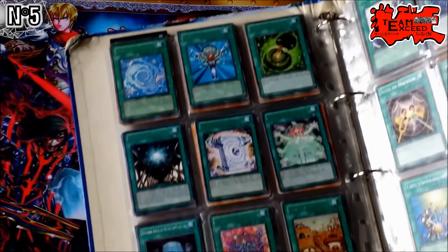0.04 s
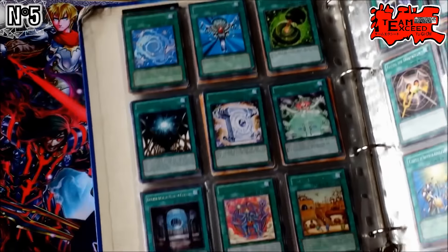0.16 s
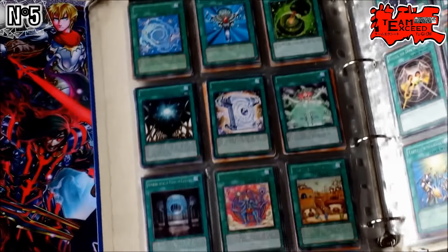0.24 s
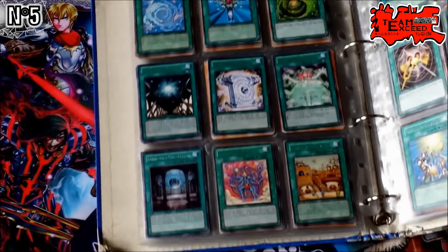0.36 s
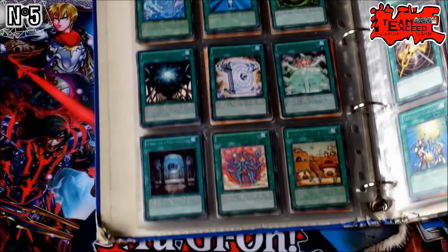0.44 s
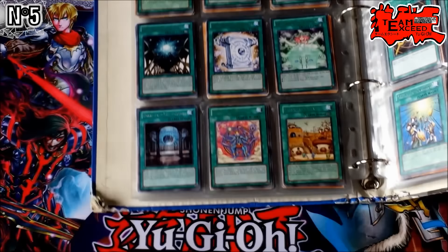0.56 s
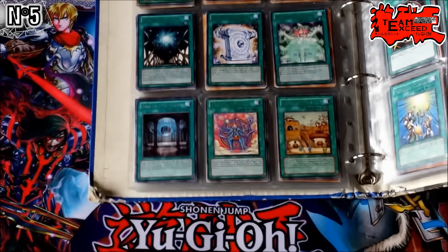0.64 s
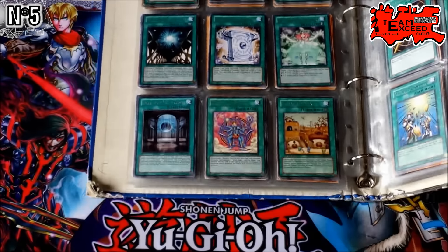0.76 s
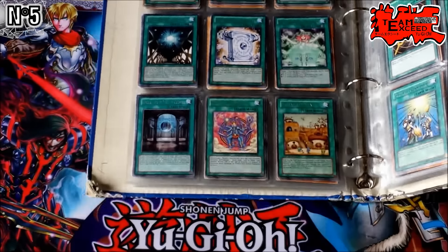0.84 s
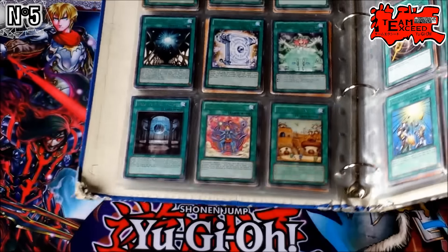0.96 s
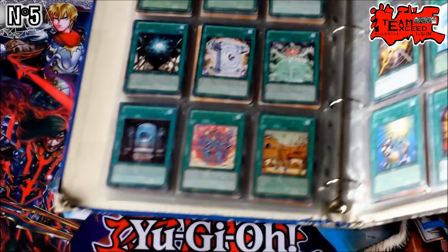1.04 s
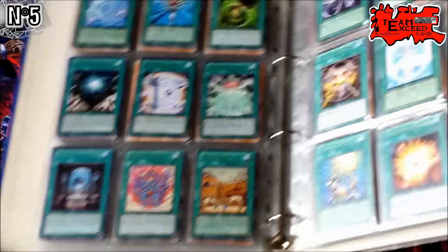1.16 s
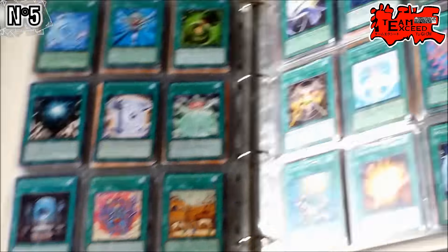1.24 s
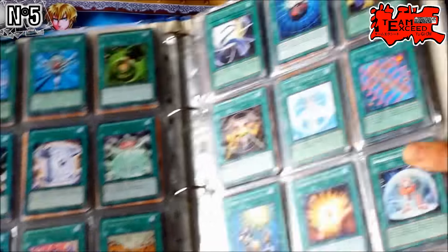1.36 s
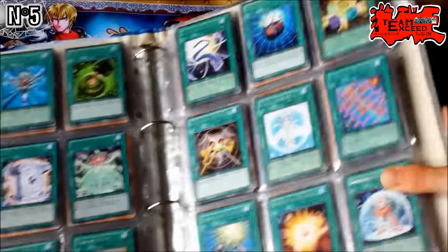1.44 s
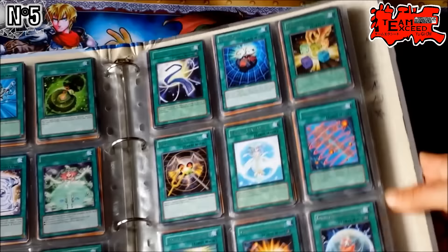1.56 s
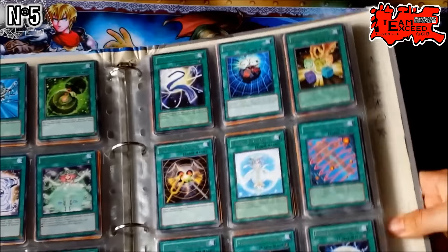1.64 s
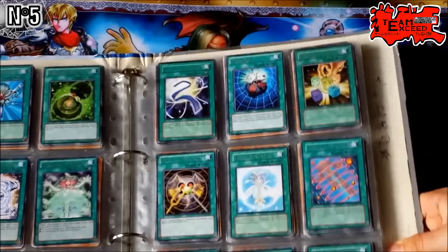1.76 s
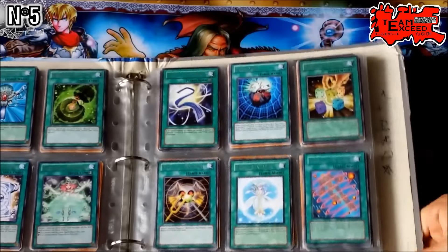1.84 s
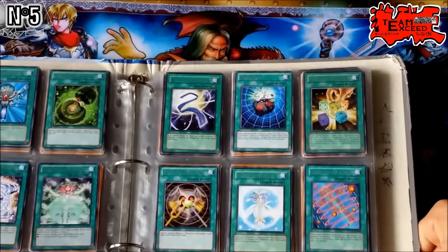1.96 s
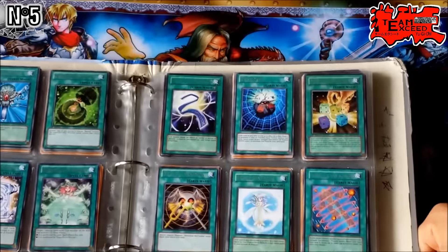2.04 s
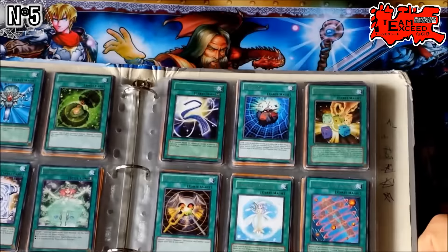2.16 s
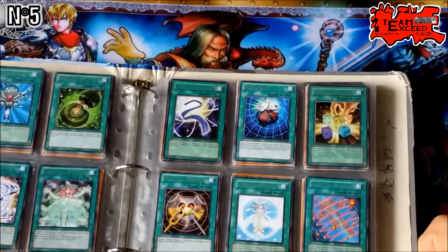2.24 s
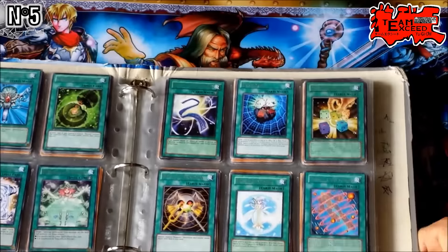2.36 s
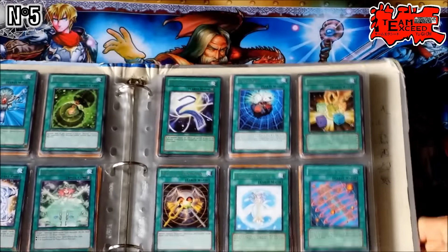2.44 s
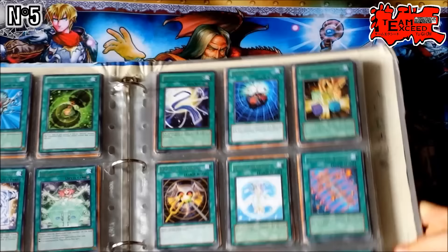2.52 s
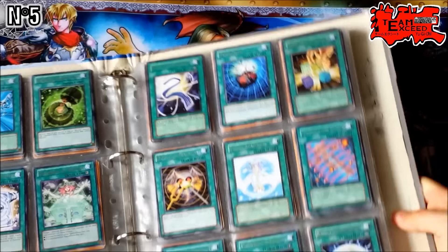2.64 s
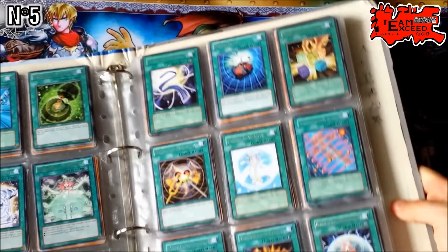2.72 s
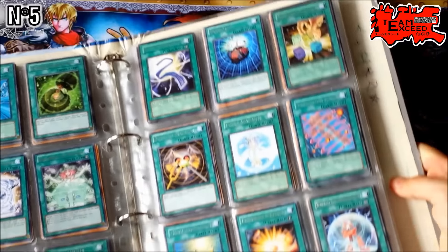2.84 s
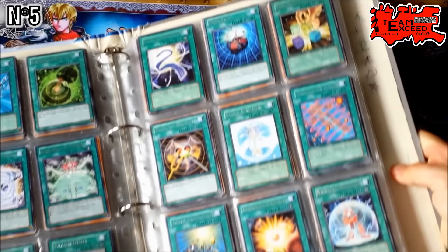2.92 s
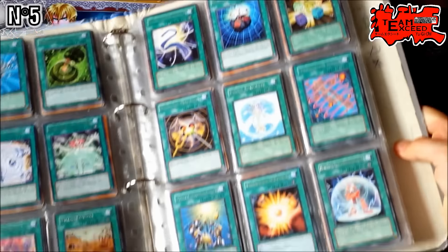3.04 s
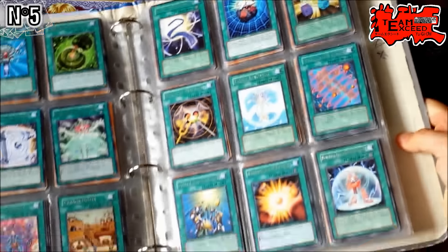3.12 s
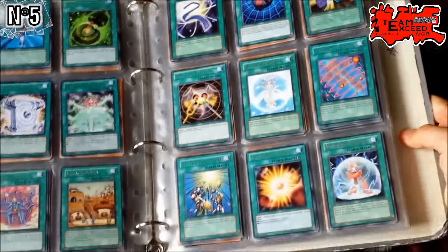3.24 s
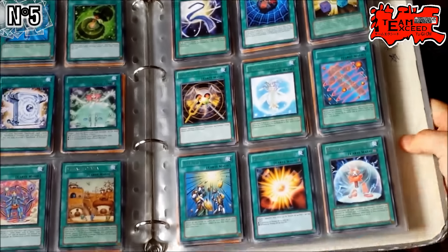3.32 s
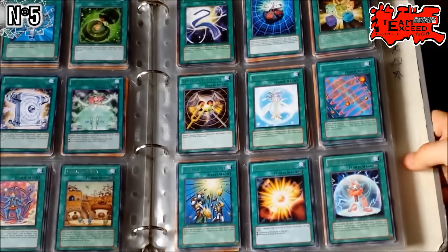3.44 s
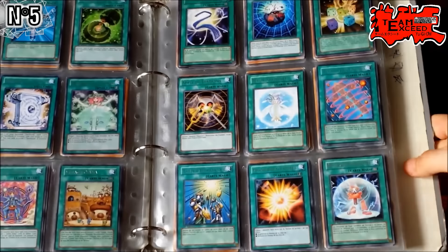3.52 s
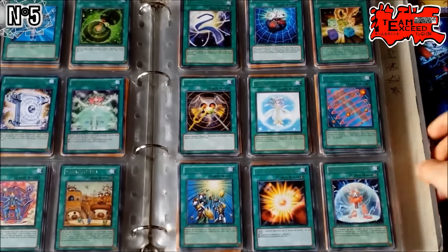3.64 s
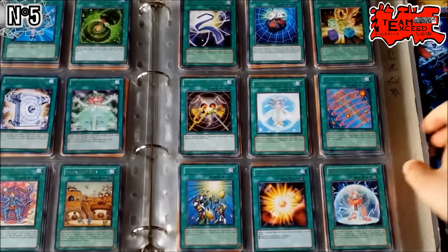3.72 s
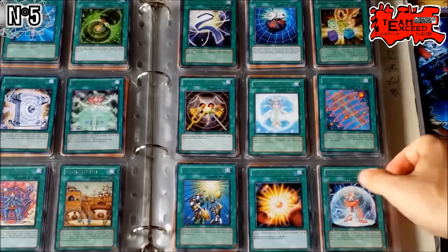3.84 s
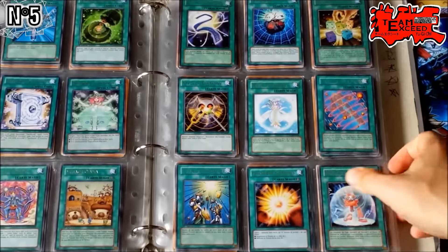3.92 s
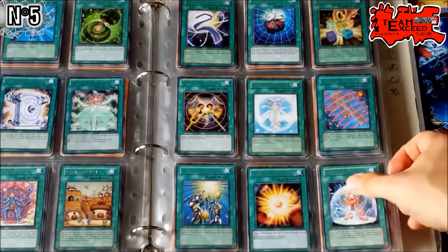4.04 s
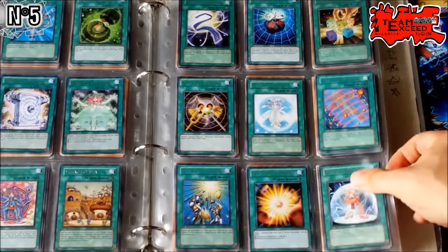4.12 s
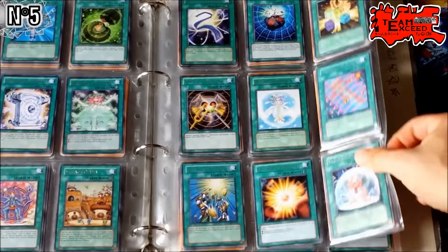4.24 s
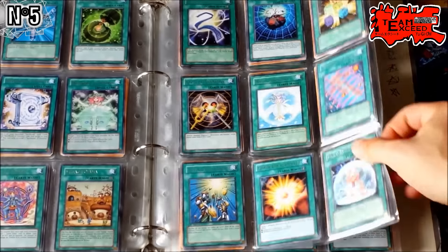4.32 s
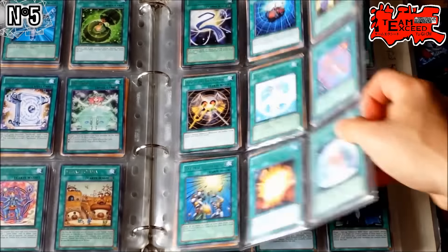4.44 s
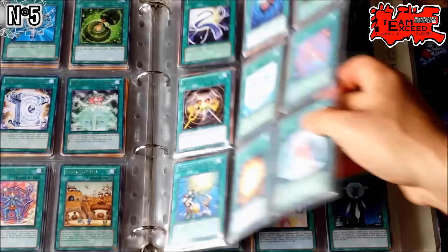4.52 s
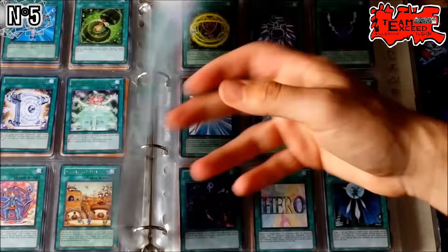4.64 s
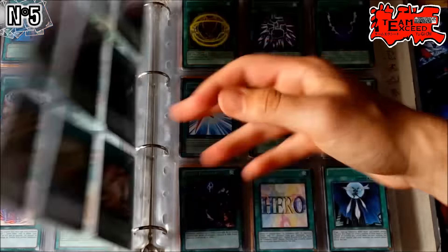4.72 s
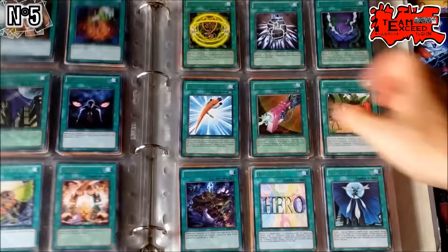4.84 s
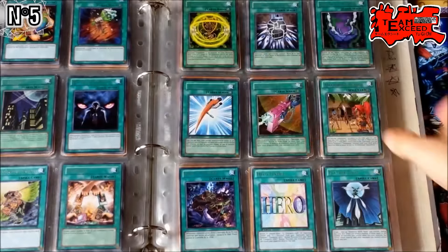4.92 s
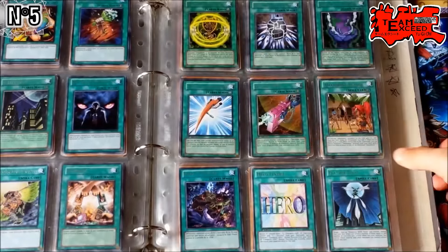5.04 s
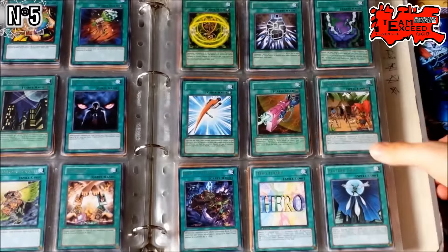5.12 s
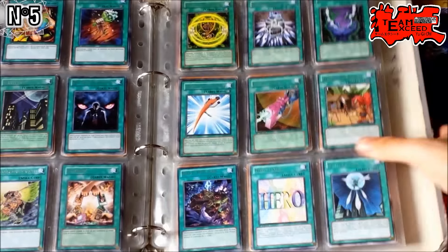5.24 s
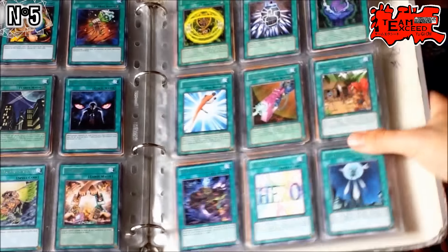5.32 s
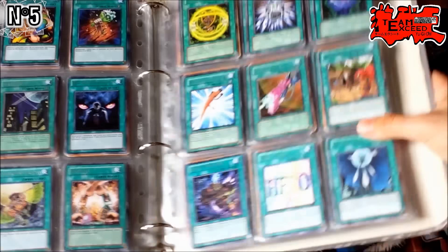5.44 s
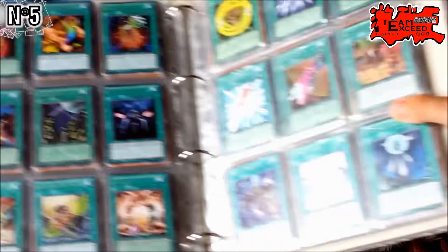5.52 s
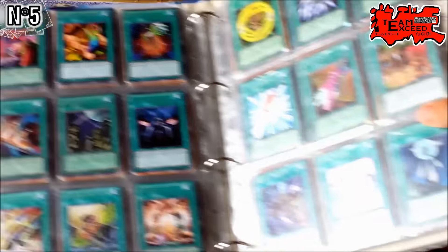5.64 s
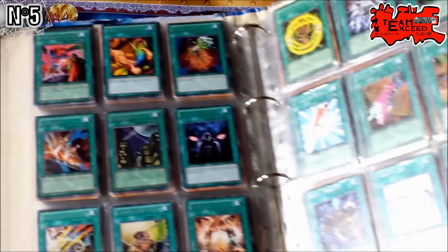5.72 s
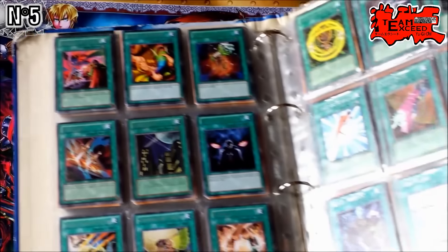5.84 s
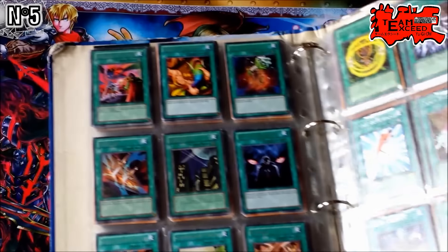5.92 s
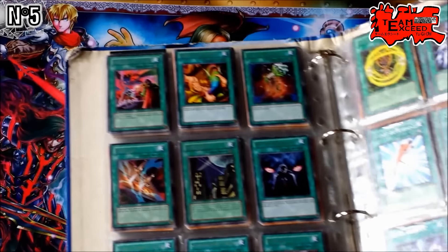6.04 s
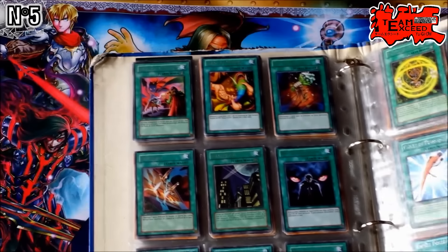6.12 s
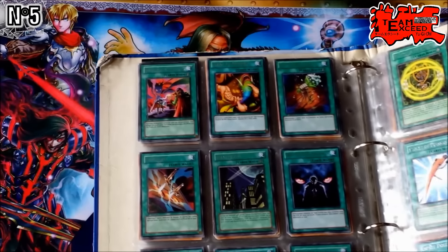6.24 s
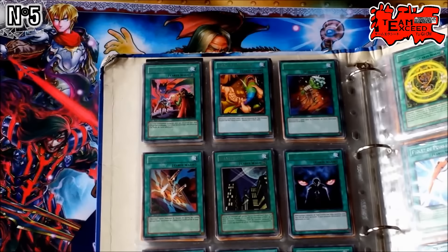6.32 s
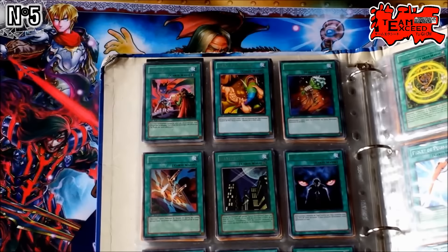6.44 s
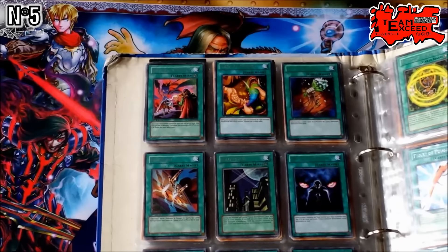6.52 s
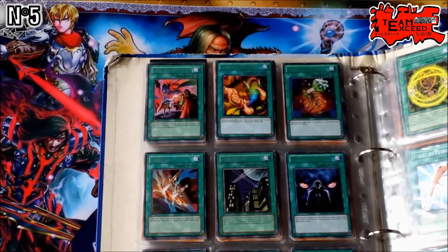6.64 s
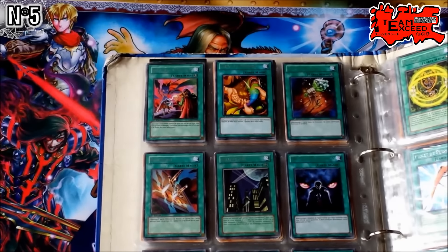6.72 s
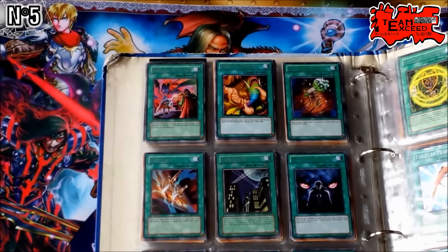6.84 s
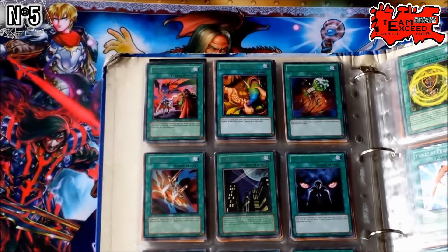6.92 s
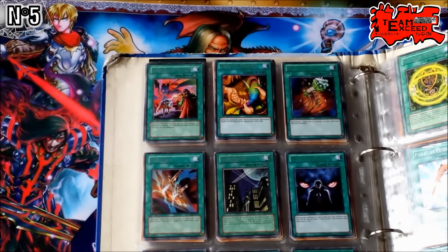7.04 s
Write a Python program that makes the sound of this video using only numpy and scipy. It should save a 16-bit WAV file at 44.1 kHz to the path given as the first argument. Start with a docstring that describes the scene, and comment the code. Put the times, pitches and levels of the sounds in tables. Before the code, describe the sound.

Close stereo pickup in a small room. A binder slides over a cloth mat in soft, airy hisses with fizzing edges and low rumble. A bright plastic snap cuts in early. Later another sharp snap starts a page turn, sleeves crinkle and tick, and the page slaps flat. A last scuffing slide fades into quiet room air and a faint fan hum.

```python
"""Ring binder on a cloth mat

In a small room, close to a stereo pair of microphones, a binder of plastic sleeves is pushed over cloth.
Shaped noise gives the hiss of the mat, the fizz of the edges and the rumble and scuffs of the cover.
Sharp pulses snap the plastic, decaying sines bump the cover, and one page slaps flat with a ringing cover.
Reverberant noise answers the plastic; faint room air and a fan's wavering hum lie behind."""
import sys
import numpy as np
from scipy import signal
from scipy.fft import rfft, irfft, next_fast_len
from scipy.io import wavfile
from scipy.ndimage import uniform_filter1d, map_coordinates

SR = 44100
rng = np.random.default_rng(int(sys.argv[2]) if len(sys.argv) > 2 else 0)


def wav_out(sig):
    """Save sig, one row per channel (or a flat mono array), as 16-bit PCM at SR to the path in sys.argv[1]."""
    wavfile.write(sys.argv[1], SR, np.round(np.clip(np.atleast_2d(sig).T, -1, 1) * 32767).astype(np.int16))


N = 311787  # length in samples


def amp(db):
    """Decibels to gain."""
    return 10 ** (np.asarray(db) / 20)


def unit(x):
    """x scaled to rms 1."""
    return x / np.sqrt(np.mean(x ** 2) + 1e-20)


def one_ms(x):
    """x scaled to the energy of one millisecond at rms 1."""
    energy = np.mean(np.sum(x ** 2, axis=-1))
    return x * np.sqrt(SR / 1000 / energy)


def along(points, hz):
    """(Hz, value) points read on a log frequency axis."""
    point_hz, values = np.transpose(points)
    return np.interp(np.log(hz + 1), np.log(point_hz + 1), values)


def wobble(rate):
    """A smooth random curve with rate knots a second."""
    knots = rng.standard_normal(int(N * rate / SR) + 4)
    return map_coordinates(knots, [np.arange(N) * rate / SR])


def swell(s, rise, fall, roundness=1):
    """A gain that peaks at s, 20 dB lower rise seconds before and fall seconds after."""
    t = np.arange(N) / SR - s
    distance = np.maximum(-t / rise, t / fall)
    return amp(-20 * np.minimum(distance ** roundness, 10))


def together(gains):
    """Overlapping noises add in power."""
    return np.sqrt(sum(g ** 2 for g in gains))


def filtered(x, response):
    """x times a response of frequency."""
    n = x.shape[-1]
    size = next_fast_len(n + 8192)
    spectrum = rfft(x, size) * response(np.fft.rfftfreq(size, 1 / SR))
    return irfft(spectrum, size)[..., :n]


def spread(pair):
    """Two unrelated signals become left and right, sharing most in the low end and little in the treble."""
    # left-right correlation: hz, likeness (0 to 1)
    likeness = [(60, 0.44), (140, 0.79), (300, 0.56), (640, 0.37), (1400, 0.072), (3000, 0.02), (15000, 0)]

    def mid_and_side(hz):
        turn = np.arccos(np.clip(along(likeness, hz), -1, 1)) / 2
        return np.array([np.cos(turn), np.sin(turn)])

    mid, side = filtered(pair, mid_and_side)
    return np.array([mid + side, mid - side])


def rub(spectrum, grain_db, grain_rate, patchy_db):
    """Stereo friction noise of rms 1: tiny catches of uneven size, whose colour shifts in patches."""
    catches = rng.standard_normal((2, N)) * amp(grain_db * wobble(grain_rate))
    z = signal.stft(catches, nperseg=1024)[2]
    field = rng.standard_normal(z.shape[1:])
    field = uniform_filter1d(uniform_filter1d(field, 3, axis=0), 8, axis=1)  # over frequency, then time
    patched = signal.istft(z * amp(patchy_db * unit(field)), nperseg=1024)[1][:, :N]
    return unit(filtered(spread(patched), lambda hz: amp(along(spectrum, hz))))


def pulse(gain, size=4096):
    """The sharpest causal pulse with a given gain over frequency (minimum phase)."""
    log_gain = np.log(np.maximum(gain(np.fft.rfftfreq(size, 1 / SR)), 1e-6))
    cepstrum = irfft(log_gain)
    # folding the cepstrum onto positive time packs the energy at the start
    cepstrum[1:size // 2] *= 2
    cepstrum[size // 2 + 1:] = 0
    return irfft(np.exp(rfft(cepstrum)))


def add(track, s, sound):
    """Mix a sound in at s seconds."""
    part = track[:, round(s * SR):][:, :sound.shape[1]]
    part += sound[:, :part.shape[1]]


def sliding():
    """The cloth hisses under the binder, its edge fizzes over the weave and the cover rumbles with each push."""
    # pushes over the mat: peak_s, rise_s and fall_s over 20 dB, cloth_hiss_db, edge_fizz_db, cover_rumble_db
    pushes = [(0.38, .41, .24, -45.3, -56.5, -61), (0.74, .52, .22, -42.3, -47.5, -53.5),
              (0.97, .04, .1, -59.5, -64, -65.5), (1.29, .19, .15, -46, -53.5, -56),
              (1.46, .17, .17, -38.5, -49.5, -57), (1.61, .15, .26, -42.5, -52, -56.5),
              (2.07, .2, .14, -56, -63.5, -62), (2.3, .12, .28, -60.5, -72, -67.5),
              (2.64, .18, .26, -52.5, -61.5, -61), (2.84, .07, .09, -59, -60.5, -52),
              (3.17, .51, .15, -56.5, -63.5, -63.5), (3.4, .27, .2, -45, -54, -56.5),
              (3.62, .06, .16, -58, -68, -63.5), (3.82, .11, .15, -55, -60.5, -58),
              (4.07, .09, .13, -59.5, -64.5, -67), (5.49, .26, .13, -51.5, -59, -59),
              (5.56, .07, .18, -56.5, -63, -60), (5.81, .27, .63, -42.5, -54, -58),
              (6.12, .18, .29, -58, -58, -58.5), (6.69, .07, .18, -68.5, -80.5, -78)]
    # plastic edges catch and fizz briefly: peak_s, fizz_db
    edge_catches = [(0.241, -47), (1.136, -57), (3.281, -47), (4.32, -49.5)]
    catch_rise_s, catch_fall_s = 0.045, 0.11  # over 20 dB
    # colours of cloth, edge and cover: hz, relative_db (per Hz)
    cloth_colour = [(500, -32), (900, -15), (1450, -15), (2690, -4.5), (3800, -3), (5370, 0.5),
                    (6980, -3.5), (9500, -13), (15000, -30)]
    edge_colour = [(3000, -45), (6500, -2), (8500, 0.5), (12500, -3.5), (15500, -6.5)]
    cover_colour = [(20, -25), (32, -6), (50, -10), (88, 0.5), (138, 2), (162, -7), (195, 3), (255, -10),
                    (300, -4.5), (420, -9), (470, -3), (540, -10), (950, -9.5), (1500, -14.5),
                    (2000, -11.5), (3200, -34)]
    push_roundness = 2.2  # 1 is a pointed swell, more gives a flatter top and steeper flanks
    fizz_grows, rumble_grows = 0.85, 0.55  # dB per dB of hiss within a push
    growth = np.array([[1], [fizz_grows], [rumble_grows]])

    hiss, fizz, rumble = together(
        amp(levels_db)[:, None] * swell(s, rise, fall, push_roundness) ** growth
        for s, rise, fall, *levels_db in pushes)
    brief_fizz = [amp(db) * swell(s, catch_rise_s, catch_fall_s) for s, db in edge_catches]
    fizz = together([fizz] + brief_fizz)
    jerks = wobble(25)  # shared by cloth and edge
    cloth = hiss * amp(1.0 * jerks) * rub(cloth_colour, grain_db=0.5, grain_rate=1200, patchy_db=2.5)
    edge = fizz * amp(0.78 * jerks) * rub(edge_colour, grain_db=2.0, grain_rate=1300, patchy_db=1.3)
    cover_level = rumble * amp(1.45 * wobble(30))
    cover = cover_level * rub(cover_colour, grain_db=1.5, grain_rate=250, patchy_db=3.0)
    return cloth + edge + cover


def scuffing():
    """The cover scuffs dully as it swivels: papery friction noise, lower than the hiss of the cloth."""
    # scuffs: peak_s, level_db, rise_s and fall_s over 20 dB
    scuffs = [(0.56, -58.0, 0.05, 0.23), (3.82, -60.0, 0.18, 0.12), (5.55, -54.0, 0.1, 0.12),
              (6.14, -52.0, 0.24, 0.24)]
    # hz, relative_db (per Hz)
    scuff_colour = [(120, -25), (350, -4), (700, -0.5), (1200, -3), (2000, -12), (4000, -33)]
    level = together(amp(db) * swell(s, rise, fall) for s, db, rise, fall in scuffs)
    return level * rub(scuff_colour, grain_db=2.5, grain_rate=300, patchy_db=2.2)


def flexing():
    """Sleeves bend and brush each other, crinkling in clumps of coarse-grained noise."""
    # bends of the sleeves, and a faint rustle at 4.53 s: peak_s, level_db (before direct and room gains),
    # rise_s and fall_s over 20 dB
    flexes = [(1.71, -54, .06, .14), (1.812, -49, .012, 0.05), (2.84, -56, .03, .06),
              (4.193, -48.5, 0.04, .07), (4.308, -49.5, 0.15, .12), (4.53, -69, .3, .3),
              (4.69, -48, .03, .08), (4.823, -38.3, 0.075, 0.1), (4.96, -56.5, 0.15, 0.13),
              (5.058, -42, 0.05, 0.0238)]
    # hz, relative_db (per Hz)
    sleeve_colour = [(35, -30), (70, 0.5), (145, -3), (350, -2.5), (800, -5.5), (1630, -8.5), (2410, -4.5),
                     (3200, -7.5), (6000, -5.5), (8000, -9.5), (15500, -24.5)]
    level = together(amp(db) * swell(s, rise, fall) for s, db, rise, fall in flexes)
    clumps = amp(1.6 * wobble(90))
    crinkle = level * clumps * rub(sleeve_colour, grain_db=4.5, grain_rate=650, patchy_db=2.5)
    return amp(1.0) * crinkle + amp(-0.5) * room(crinkle)[:, :N]


def snaps(shiver_t60=0.013, shiver_db=-2, rebound_s=0.00063, rebound=0.31, right_db=0.2):
    """Plastic buckles with a sharp pulse, springs back and shivers for a few milliseconds."""
    # snaps and ticks of sleeves and cover: start_s, level_db (over 1 ms, before the direct trim),
    # centre_hz, half_width_octaves, room_db (relative to level_db)
    snap_list = [(0.543, -41, 587, 0.93, -1.5), (1.2564, -44, 1400, 0.94, 2),
                 (1.6732, -16.8, 6800, .68, -4), (1.6736, -23.5, 2350, .5, -2.5),
                 (1.682, -29, 5900, 0.39, -2), (1.8132, -39, 1650, .45, -4), (1.813, -30, 5340, 0.81, -.5),
                 (2.034, -48.5, 900, 0.39, -2), (2.8076, -42, 850, 1.1, -5), (2.8234, -46, 3250, .15, -.5),
                 (2.832, -36.5, 3370, .24, -2.5), (2.8414, -41, 905, .95, -3),
                 (2.8547, -44, 1500, 0.85, -4), (2.871, -43, 4040, .4, -9),
                 (3.102, -41.5, 1350, 0.59, -4.5), (3.1062, -48, 600, 1.1, -3),
                 (3.1672, -46, 550, 0.66, -5), (3.1994, -37.5, 1410, .6, -4),
                 (3.2074, -38.5, 600, 1.6, -14), (3.7318, -47.5, 1130, .6, -2),
                 (4.122, -38, 4700, .68, -1.5), (4.19, -19, 2550, 1.07, -1.5), (4.1903, -36, 10500, .4, -2),
                 (4.2066, -29, 4600, 0.37, 5.5), (4.3158, -36, 1610, 0.34, -7),
                 (4.4791, -48.5, 1440, 0.54, -5), (4.6, -51, 1170, 0.44, -1),
                 (4.6773, -24.5, 5000, 0.35, -5), (4.678, -35.5, 2000, 0.74, -3),
                 (4.7003, -36, 950, 0.83, 1), (4.797, -27, 1090, .75, -1), (4.835, -32, 2520, 0.62, 3),
                 (4.862, -33.5, 1740, 0.53, -3), (4.9123, -41, 1500, .7, -6), (5.4071, -48, 930, 1.1, -1),
                 (5.5084, -42, 750, 0.99, -0.5), (5.721, -38, 4580, 0.99, -5)]
    # the brighter a snap, the stronger its wide spray
    spray_base_db, spray_at_hz, spray_db_per_octave = -18, 4000, 2
    direct_trim_db = -.5
    out, t = np.zeros((2, N)), np.arange(SR // 50) / SR
    for s, db, centre_hz, octaves, room_db in snap_list:
        spray_db = spray_base_db + spray_db_per_octave * np.log2(centre_hz / spray_at_hz)
        shiver = rng.standard_normal((2, len(t))) * amp(-60 * t / shiver_t60)
        drive = amp(shiver_db) * shiver / np.linalg.norm(shiver, axis=1, keepdims=True)
        drive[:, 0] += 1
        rebound_at = np.round(SR * rebound_s * rng.uniform(.5, 1.3, 2)).astype(int)  # one for each side
        drive[[0, 1], rebound_at] -= rebound
        # a steep-sided band over a weak, wide spray
        band = lambda hz: np.exp(-.5 * (np.log2((hz + 1) / centre_hz) / octaves) ** 4)
        spray = lambda hz: amp(spray_db) / (1 + (hz / (4 * centre_hz)) ** 2)
        tick = pulse(lambda hz: band(hz) + spray(hz))[None]
        direct = one_ms(signal.fftconvolve(drive, tick, axes=1))
        add(out, s, amp(db + direct_trim_db) * direct)
        add(out, s, amp(db + room_db) * room(one_ms(tick)))
    return out * amp([[-right_db], [right_db]])


def landing(settle_t60=0.16, ring_rise=0.0042, pocket_db=3):
    """The page hits the stack with a crack, the loaded cover rings, and the pockets patter down."""
    landing_s = 5.0626
    # slap colour: hz, relative_db (per Hz)
    slap_colour = [(30, -36), (70, -16), (125, -4), (230, -0.5), (300, -2.5), (380, -1), (480, -9),
                   (620, -5), (1000, -4), (1400, -4.5), (1700, -12.5), (2620, -9.5), (5660, -8.5),
                   (10800, -20), (15500, -26.5)]
    # modes of the loaded cover: pitch_hz, start_db (before the soft rise), t60_s
    modes = [(160, -31, 0.23), (234.6, -32, 0.24), (346, -37.5, 0.35), (569, -37, 0.35), (727, -43, 0.37),
             (836, -40, 0.44), (965, -42, 0.33), (1038, -42, 0.34), (1239, -43, 0.34), (1445, -40, .27)]
    out, t = np.zeros((2, N)), np.arange(SR // 2) / SR
    slap = one_ms(pulse(lambda hz: amp(along(slap_colour, hz)))[None])

    def burst(t60):
        """Uneven contacts dying away, as noise of unit energy."""
        contacts = spread(rng.standard_normal((2, len(t)))) * amp(pocket_db * wobble(496)[:len(t)])
        return unit(contacts * amp(-60 * t / t60)) / np.sqrt(len(t))

    impact = (t == 0) + 1.3 * burst(0.0074)
    crack = amp(-12.0) * one_ms(signal.fftconvolve(impact, slap, axes=1))
    patter = amp(-9.5) * one_ms(signal.fftconvolve(burst(settle_t60), slap, axes=1))
    ring = sum(amp(db - 60 * t / t60) * np.sin(2 * np.pi * (hz * t + rng.random())) for hz, db, t60 in modes)
    add(out, landing_s, crack + patter)
    add(out, landing_s, ring[None] * (1 - np.exp(-t / ring_rise)))
    add(out, landing_s, amp(-7.5) * room(slap))
    return out


def bumps(rise=0.008):
    """The cover bumps softly on the table; each contact rings one low mode."""
    # bumps: start_s, start_db (before the soft rise), pitch_hz, t60_s
    bump_list = [(1.314, -44, 135.5, 0.3), (2.829, -45, 190.6, 0.15), (4.192, -48.5, 133.6, 0.22),
                 (4.345, -49, 160, 0.16), (5.013, -43, 150, .12), (5.062, -35.5, 135, .22)]
    out, t = np.zeros((2, N)), np.arange(SR // 2) / SR
    for s, db, hz, t60 in bump_list:
        envelope = amp(db - 60 * t / t60) * (1 - np.exp(-t / rise))
        add(out, s, (envelope * np.sin(2 * np.pi * hz * t))[None])
    return out


def room(x, first_wall=0.003):
    """The room's answer swells over the first milliseconds, then each band dies at its own rate."""
    # hz, t60_s
    decay = [(120, 0.35), (400, 0.39), (1000, 0.38), (3000, 0.39), (6000, 0.36), (14000, 0.39)]
    hz, t, z = signal.stft(rng.standard_normal((2, SR * 3 // 4)), SR, nperseg=256)
    fading = z * amp(-60 * t / along(decay, hz)[:, None])
    tail = spread(signal.istft(fading, SR, nperseg=256)[1])
    tail *= 1 - np.exp(-(np.arange(tail.shape[1]) / SR / first_wall) ** 2)
    return signal.fftconvolve(x, tail * np.sqrt(2 / np.sum(tail ** 2)), axes=1)


def background():
    """Quiet room air as shaped noise, and a fan's hum as sines of wandering phase."""
    # air colour: hz, relative_db (per Hz)
    air_colour = [(15, -39.5), (28, -18), (86, -11.5), (140, -13), (198, -8.5), (235, -21), (290, -12),
                  (400, -20), (465, -17), (620, -19.5), (950, -21), (1800, -24.5), (6000, -24),
                  (15500, -27.5)]
    # fan tones: pitch_hz, rms_db
    fan_tones = [(91.5, -77.5), (193.8, -79), (463, -78.5)]
    t = np.arange(N) / SR
    hum = sum(amp(db) * np.sqrt(2) * np.sin(2 * np.pi * hz * t + 0.61 * wobble(18)) for hz, db in fan_tones)
    return amp(-63.0) * rub(air_colour, grain_db=-0.8, grain_rate=24, patchy_db=0.0) + hum


def scene():
    """Everything on the table, and the room around it."""
    return sliding() + scuffing() + flexing() + snaps() + bumps() + landing() + background()


def record(dry):
    """The right microphone hears more over most of the range, above all in the top treble; a band limit cuts."""
    # left over right: hz, left_minus_right_db
    lean = [(60, -2), (250, -3), (1000, -2.5), (2400, -2.5), (4600, 0), (8100, -6.5), (15000, -7.5)]
    top_hz = 15700

    def response(hz):
        sides = amp(np.array([[.5], [-.5]]) * along(lean, hz))
        return sides / np.sqrt(np.mean(sides ** 2, axis=0)) * (hz < top_hz)

    return filtered(dry, response)


dry = scene()
out = record(dry)
wav_out(out)
```